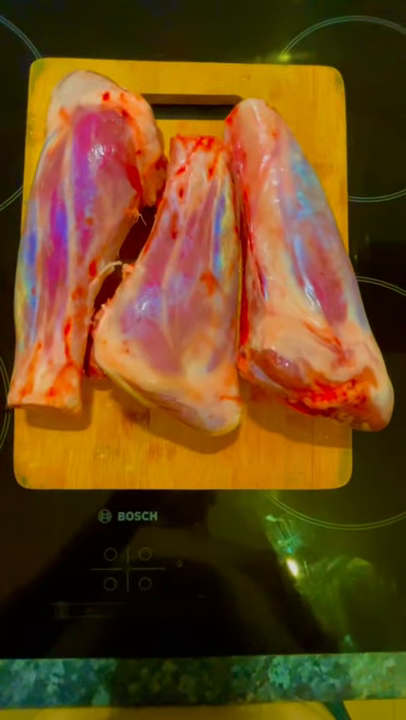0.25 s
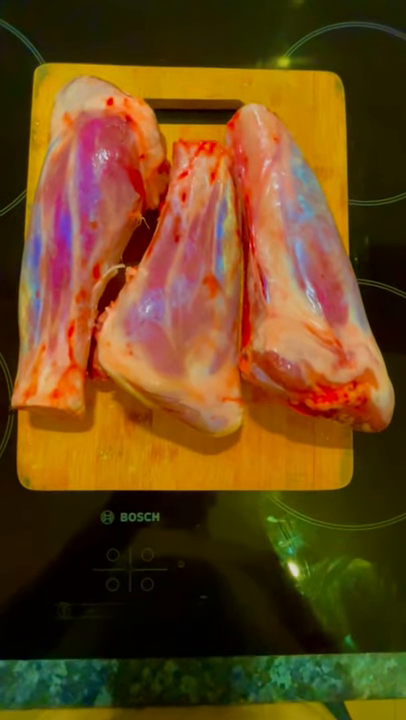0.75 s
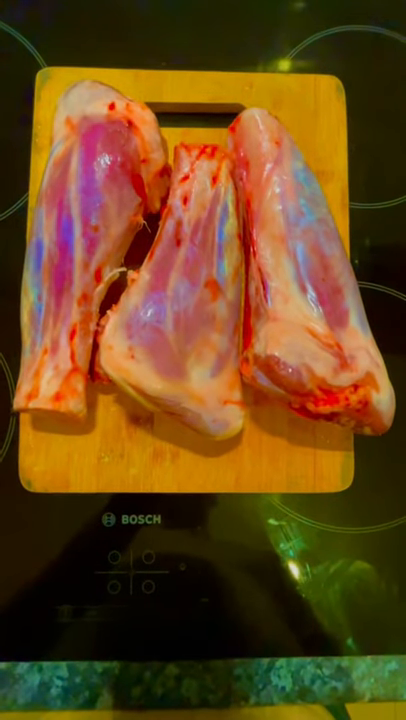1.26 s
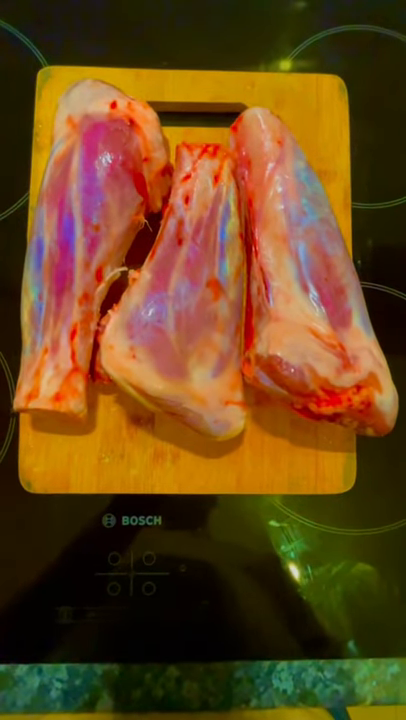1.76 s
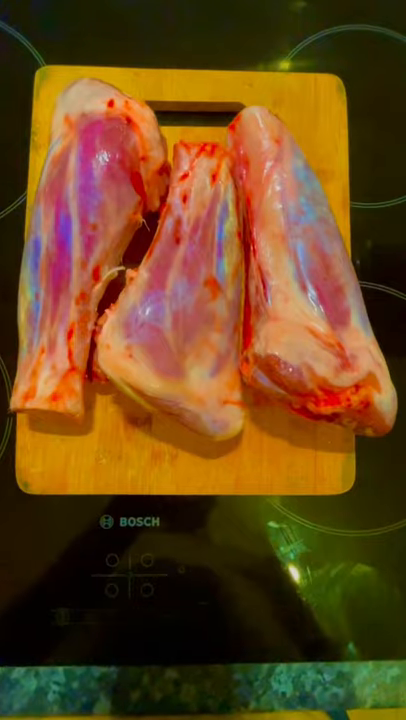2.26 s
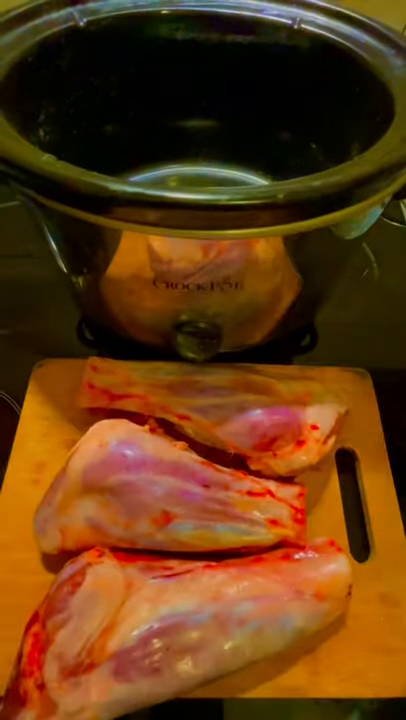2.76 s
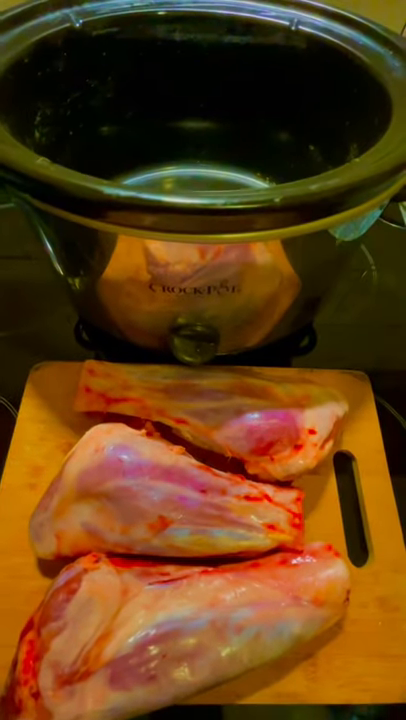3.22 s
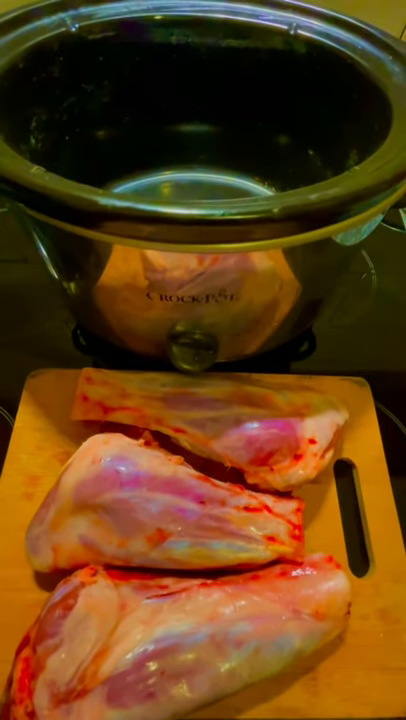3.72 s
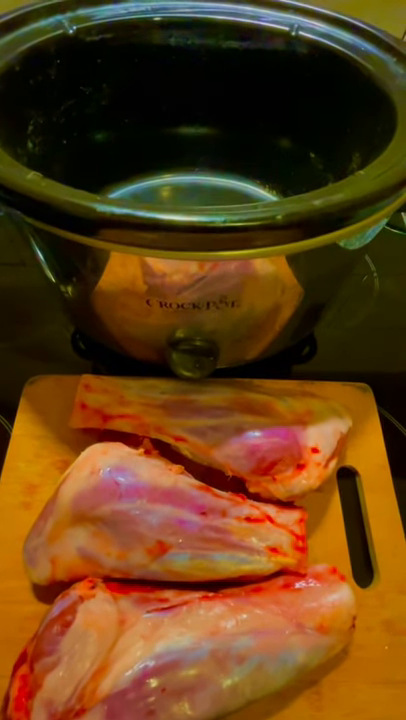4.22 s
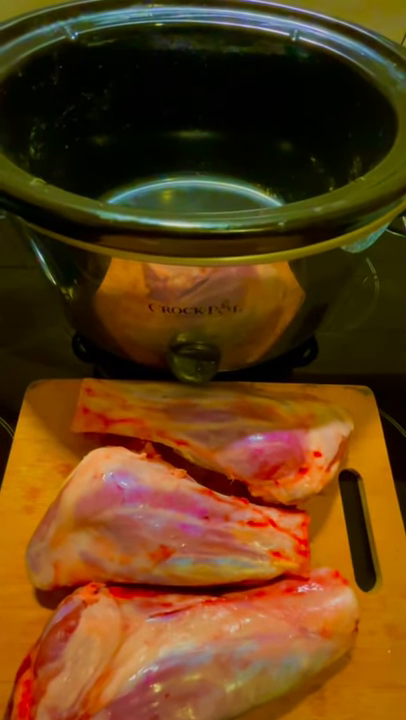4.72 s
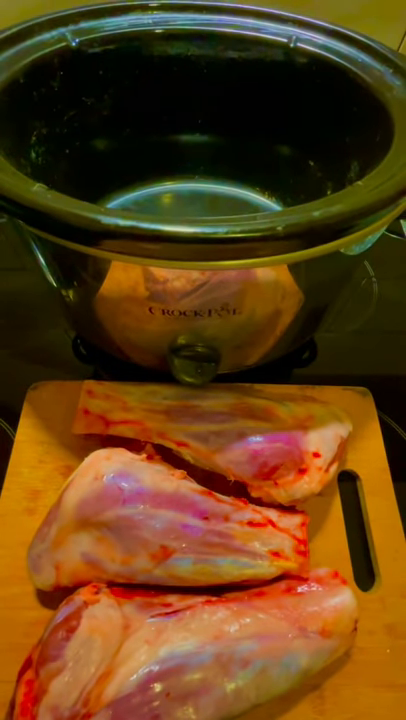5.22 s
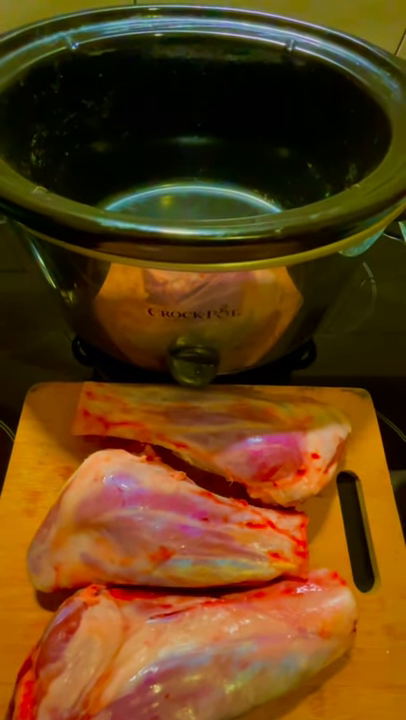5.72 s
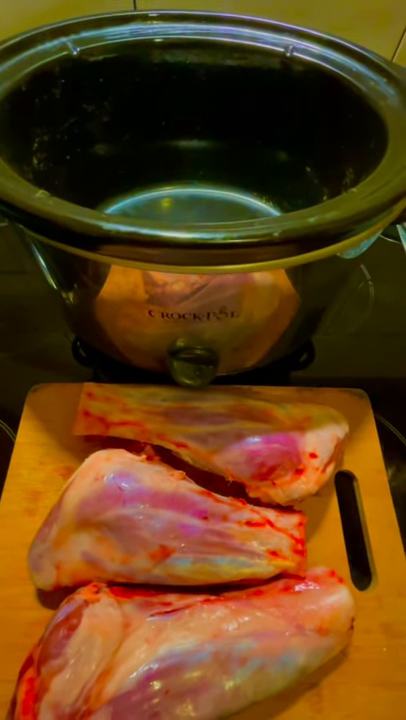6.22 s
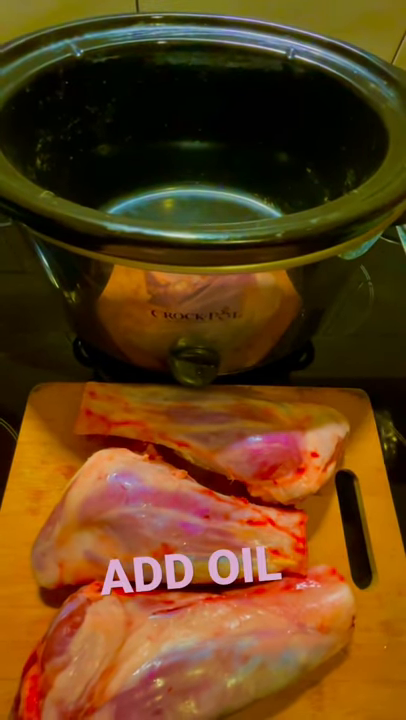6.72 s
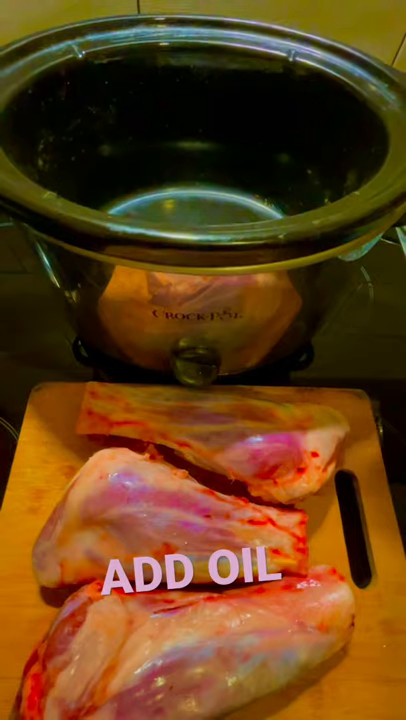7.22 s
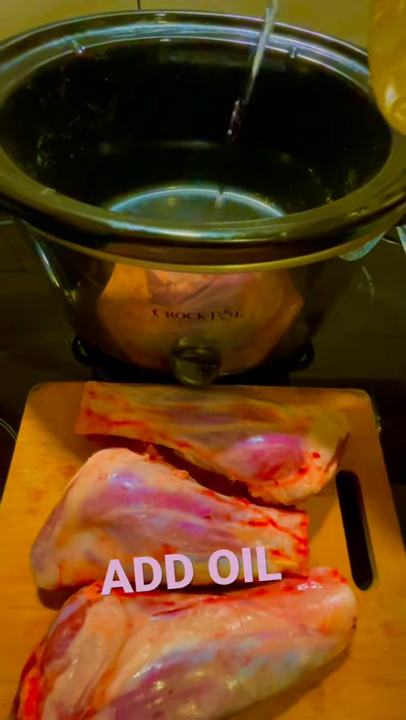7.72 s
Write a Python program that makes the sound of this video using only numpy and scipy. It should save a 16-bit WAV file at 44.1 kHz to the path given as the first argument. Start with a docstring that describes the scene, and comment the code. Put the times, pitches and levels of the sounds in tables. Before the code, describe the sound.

Close stereo pickup in a small, slightly reverberant kitchen. Steady low mains and motor hum continues throughout, joined at first by a throb that stops abruptly. A heavy pot gives a dull knock as its glass lid comes off; the lid then hits the worktop sharply, bouncing in a fast clatter. Faint plastic scrapes and cap clicks follow, strongest past five seconds, then near quiet and a faint wash of oil.

```python
"""A mains hum, a motor tone and a slow throb are heard first in a quiet kitchen; the throb stops at a cut.
A glass lid is lifted off a stoneware pot and set down on the worktop with bounces: noisy contacts excite
damped modes. Hands then shuffle a plastic bottle, heard as grains of friction noise; its cap ticks and
snaps as short noise bursts, some with hollow rings, and oil begins to run as a soft wash of noise.
Noise tails add the reflections of the room; shaped noise gives its air and uneven low noise at the sides."""
import sys
import numpy as np
from scipy import signal
from scipy.fft import rfft, irfft
from scipy.io import wavfile
from scipy.ndimage import map_coordinates

SR = 44100
rng = np.random.default_rng(int(sys.argv[2]) if len(sys.argv) > 2 else 0)


def inscribe(sig):
    """Save sig as 16-bit PCM at rate SR to the path in sys.argv[1].

    A 1-D sig is mono; a 2-D sig holds one channel per row.
    Samples are clipped to [-1, 1] before scaling.
    """
    pcm = np.round(np.clip(np.atleast_2d(sig).T, -1, 1) * 32767)
    wavfile.write(sys.argv[1], SR, pcm.astype(np.int16))


def makeup_ratio(level_db):
    """Linear amplitude ratio for a level in decibels (20 dB per factor of ten)."""
    decades = np.asarray(level_db, float) / 20
    return 10 ** decades


N = 351343
CUT_S = 2.385   # cut in the sound: throb and low side noise end, the room air changes


def blows(contacts, base):
    """Impact excitation: each contact is a short chatter that rings lid and base, with a dry crack."""
    # modes of the glass lid: (frequency [Hz], level [dB], t60 [s])
    lid_modes = [(1202, -10.5, 0.054), (1277, -8.5, 0.091), (1402, -6, .08), (1920, -6.5, 0.16),
                 (2480, -6, 0.13), (2474, -9, 0.075), (2590, -15.5, 0.17), (2825, -3.5, 0.061),
                 (2930, -6.5, .07), (3130, -12.5, 0.09), (3640, -10, 0.2), (4160, -11, 0.077),
                 (4600, -11.5, .06), (4943, -7, 0.091), (5214, -14, 0.036), (5620, -14, 0.092),
                 (6300, -19, 0.32), (6600, -27, .06), (7677, -30, .04), (8300, -24, 0.023)]
    # spectrum of the dry crack: (frequency [Hz], level [dB])
    crack_colour = [(180, -38), (300, -10.5), (665, -9), (908, -11.5), (1260, -10), (2050, -13),
                    (2430, -9.5), (3370, -15), (5060, -16), (12500, -40), (16200, -76.5), (22000, -120)]
    # a slower contact than hard_ms favours the low modes, a faster one the high modes, per octave
    hard_ms, dulling_db_per_ms = 3.8, 1.32
    out, t = np.zeros((2, N)), np.arange(SR) / SR
    for s, lid_db, thud_db, crack_db, ms in contacts:
        t_rel = t / ms * 1000
        shape = t_rel * np.exp(1 - t_rel)
        chatter = rng.standard_normal(SR) * shape
        chatter /= np.sqrt(np.sum(chatter ** 2))
        # the weight lands once, the rim rattles
        push = shape ** 8 / np.sum(shape ** 8) + 0.73 * chatter
        crack_tail = 0.23 * (1 - np.exp(-t_rel)) * makeup_ratio(-60 * t / .08)
        crack = colour(rng.standard_normal(SR), crack_colour) * (shape + crack_tail)
        bright_db = dulling_db_per_ms * (hard_ms - ms)
        lid_ring = makeup_ratio(lid_db) * strike(chatter, lid_modes, bright_db)
        thud = makeup_ratio(thud_db) * strike(push, base, 1.5 * bright_db)
        add(out, s, lid_ring + thud + makeup_ratio(crack_db) * crack, 0)
    return out


def strike(force, modes, bright_db):
    """Modal superposition: a force drives damped modes of set heights, tilted by bright_db per octave."""
    t = np.arange(len(force)) / SR
    out = 0
    for hz, db, t60 in modes:
        # the force's own spectrum at the mode is divided out
        taken_up = abs(np.sum(force[:2000] * np.exp(2j * np.pi * hz * t[:2000]))) + .3
        out = out + makeup_ratio(db + bright_db * np.log2(hz / 1000)) / taken_up * ring(force, hz, t60)
    return out


def ring(drive, hz, t60):
    """Damped resonator: a unit click sets a sine of height 1 ringing."""
    r, w = makeup_ratio(-60 / (t60 * SR)), 2 * np.pi * hz / SR
    return signal.lfilter([0, np.sin(w)], [1, -2 * r * np.cos(w), r * r], drive + 1e-18)


def bottle():
    """Transient radiation and free decay: broadband snaps, half rough hollow rings and low bumps."""
    # ticks of bottle and cap: (time [s], level [dB], centre [Hz], t60 [s], left over right [dB])
    ticks = [(4.0682, -42, 10230, 0.026, -2), (4.2614, -40, 4900, 0.041, -2),
             (4.5191, -44, 5680, 0.025, -7.5), (4.591, -42, 5470, 0.13, -1),
             (4.9574, -47.5, 4250, 0.025, -2.5), (5.0594, -40.5, 11040, 0.083, 1),
             (5.1818, -26, 5170, 0.083, -2.5), (5.2298, -33, 8360, 0.025, 0.5),
             (5.2506, -30.5, 6720, 0.049, 2), (5.2662, -37.5, 4100, 0.028, -2),
             (5.2922, -35.5, 5900, 0.03, -3.5), (5.3519, -30, 12000, 0.041, -2.5),
             (5.385, -19.5, 4815, 0.033, -1.5), (5.4347, -33, 11760, 0.031, 0),
             (5.476, -36.5, 6100, 0.044, -1.0), (5.5132, -38, 6200, 0.089, -1),
             (5.5952, -45, 4020, 0.029, -3), (6.219, -40, 4630, 0.04, 5.5),
             (7.1367, -47, 9030, 0.027, -0.5)]
    # hollow rings: (time [s], frequency [Hz], level [dB], t60 [s], bandwidth of the rough part [Hz])
    hollow_rings = [(4.171, 2010, -55, 0.035, 300), (4.447, 2353, -52.5, 0.076, 350),
                    (4.756, 1856, -51, 0.54, 50), (5.183, 704, -38.5, 0.16, 28), (5.19, 784, -48, 0.43, 37),
                    (5.19, 863, -47.5, 0.33, 53), (5.385, 1236, -43.5, 0.31, 16),
                    (5.386, 1266, -45.5, 0.51, 16), (5.382, 1303, -27.5, 0.058, 79),
                    (7.334, 950, -66.5, 1, 180), (7.335, 1204, -67, 0.404, 174),
                    (7.645, 3580, -57.5, 0.24, 12.3)]
    # soft bumps through the worktop: (time [s], level [dB], frequency [Hz], t60 [s])
    bumps = [(1.345, -40, 71, 0.13), (4.498, -55, 111, 0.3), (4.571, -41, 80, 0.12),
             (4.754, -44, 356, 0.077), (4.765, -43.5, 215, 0.13), (4.767, -37, 114, 0.19),
             (5.074, -30, 106.4, 0.11), (5.082, -40, 66.6, 0.25), (5.103, -40, 127, 0.11)]
    out, t = np.zeros((2, N)), np.arange(SR // 2) / SR
    for s, level_db, hz, t60, pan_db in ticks:
        spectrum = [(hz / 8, -22), (hz / 1.09, -3), (hz, 0), (hz * 1.75, -6), (hz * 8, -30)]
        snap = colour(rng.standard_normal(len(t)), spectrum)
        decay = makeup_ratio(level_db - 11.0 - 60 * t / t60)
        sharp_start = 1 + 2.06 * makeup_ratio(-60 * t / 0.012)
        add(out, s, decay * snap * sharp_start * np.minimum(t / 0.00081, 1), pan_db)
    for s, hz, db, t60, width_hz in hollow_rings:
        rough = ring(rng.standard_normal(2 * len(t)), hz, np.log(1000) / np.pi / width_hz)
        rough = rms_one(rough[len(t):])   # the resonator has settled by here
        tone = 0.46 * np.sin(2 * np.pi * hz * t) + .5 * rough
        add(out, s, makeup_ratio(db - 60 * t / t60) * tone * np.minimum(t / 0.00079, 1), 0)
    for s, db, hz, t60 in bumps:
        onset = 1 - np.exp(-t * hz / 0.54)
        add(out, s, makeup_ratio(db - 60 * t / t60) * np.sin(2 * np.pi * hz * t) * onset, 0)
    return out


def shuffle():
    """Friction as dense random grains: strokes, running oil and a dry brush, partly alike left and right."""
    # strokes of hands, cloth and plastic: (start [s], hold [s], bright level [dB], dull level [dB])
    strokes = [(2.96, 0.093, -81.5, -71), (3.427, 0.039, -83.5, -62), (3.86, 0.049, -76.5, -61.5),
               (3.998, 0.031, -61, -74), (4.075, 0.055, -56, -66.5), (4.17, 0.036, -64, -62),
               (4.24, 0.1, -53, -63.5), (4.43, 0.046, -65.5, -62.5), (4.506, 0.063, -58, -61.5),
               (4.672, 0.12, -57, -62.5), (4.749, 0.09, -55, -50.5), (4.92, 0.052, -64, -67.5),
               (5.09, .08, -65, -66.5), (5.184, 0.11, -55.5, -67), (5.383, 0.04, -60, -61.5),
               (5.516, 0.076, -60, -61), (5.68, 0.06, -66, -66), (5.9, .2, -80, -68.5),
               (6.227, 0.025, -74, -89.5), (6.355, 0.038, -73.5, -75), (7.143, .02, -83, -81.5)]
    # light touch between strokes, one row: (start [s], hold [s], bright level [dB], dull level [dB])
    touch = (4, 2.5, -77.5, -71.5)
    # bright rustle spectrum: (frequency [Hz], level [dB])
    rustle_colour = [(710, -41.5), (1200, -14), (1870, -8.5), (2900, -13.5), (4010, -3), (4460, -4),
                     (4830, 0.5), (7290, -2.5), (10600, -2), (12500, -6), (16200, -37), (22000, -120)]
    # dull slide spectrum: (frequency [Hz], level [dB])
    slide_colour = [(110, -30.5), (180, -0.5), (254, -4), (484, 1), (552, -7), (875, -10.5), (1410, -19),
                    (2010, -12), (3680, -25), (4200, -17), (5460, -45), (9240, -120)]
    # wash of the running oil: (frequency [Hz], level [dB])
    pour_colour = [(150, -34), (250, -7.5), (387, 1.5), (441, -11), (478, -10), (1640, -23), (2020, -13),
                   (2750, -24), (3500, -26), (3800, -25.5), (4540, -22), (6380, -33.5), (12000, -36),
                   (15600, -62), (22000, -120)]
    # sudden dry brush: (frequency [Hz], level [dB])
    brush_colour = [(150, -48), (250, -26), (340, -1.5), (716, -5.5), (1060, -11), (1280, -26), (1990, -9),
                    (2190, -19), (4610, -16.5), (12000, -38), (15600, -69), (22000, -120)]
    rise_db_per_s, fall_db_per_s = (500, 413), (300, 120)   # bright, dull
    rough_db, alike = 1.5, .7   # spread of the grain heights; share of power common to both channels
    gains = []
    for k in range(2):
        power = sum(swell(s, hold_s, db[k], rise_db_per_s[k], fall_db_per_s[k]) ** 2
                    for s, hold_s, *db in strokes + [touch])
        gains.append(np.sqrt(power))
    gains.append(swell(7.595, 0.27, level_db=-61.5, rise_db_per_s=77.5, fall_db_per_s=66))     # oil
    gains.append(swell(1.320, 0.033, level_db=-54.5, rise_db_per_s=3000, fall_db_per_s=252))   # brush
    out = 0
    for gain, spectrum in zip(gains, [rustle_colour, slide_colour, pour_colour, brush_colour]):
        grains = rng.standard_normal((2, N)) * makeup_ratio(rough_db * rng.exponential(1, N))
        mid, side = colour(grains, spectrum)
        flutter = makeup_ratio(1.1 * drift(40) + 1.2 * drift(29))
        stereo = np.sqrt(alike) * mid + np.sqrt(1 - alike) * side * [[1], [-1]]
        out = out + gain * flutter * stereo
    return out


def swell(s, hold_s, level_db, rise_db_per_s, fall_db_per_s):
    """Exponential envelope: the gain rises to a level, holds and falls, linearly in decibels."""
    t = np.arange(N) / SR
    below_db = rise_db_per_s * np.maximum(s - t, 0) + fall_db_per_s * np.maximum(t - s - hold_s, 0)
    return makeup_ratio(level_db - below_db)


def ports(x, lead, lean=((100, 0), (1000, 0))):
    """Interchannel differences: two ports hear a near source with unlike phase and level."""
    hz = bins_hz(x)
    half_phase = 1j * np.interp(hz, *np.transpose(lead)) / 2
    half_level = at_hz(lean, hz) * np.log(10) / 40   # half the dB difference, as a natural logarithm
    return filtered(x, np.exp((half_phase + half_level) * [[1], [-1]]))


def kitchen(x):
    """Diffuse reverberation: reflections as noise that dies band by band, wider in the treble."""
    # reverberation: (frequency [Hz], t60 [s], side over middle [ratio])
    reflections = [(100, 0.55, .12), (400, 0.3, .45), (900, 0.42, .8), (2010.6, .39, 0.79),
                   (6013, .37, 1.0), (8500, 0.36, 1.0), (12000, 0.12, 0.99)]
    t, edges, tail = np.arange(SR) / SR, 60 * 2 ** np.arange(0, 8.5, .5), 0
    for low, high in zip(edges, edges[1:]):
        band = signal.butter(2, [low, high], "band", fs=SR, output="sos")
        mid, side = signal.sosfilt(band, rng.standard_normal((2, SR)))
        hz = np.sqrt(low * high)
        stereo = mid + at_hz(reflections, hz, order=2) * side * [[1], [-1]]
        tail = tail + stereo * makeup_ratio(-60 * t / at_hz(reflections, hz))
    tail = tail * (1 - np.exp(-t / 0.001))   # reflections build up over the first milliseconds
    return signal.fftconvolve(x, tail / np.sqrt(np.sum(tail ** 2) / 2), axes=1)[:, :N]


def hum():
    """Periodic machines as harmonic sums: mains, motor, faint whine, and a throb that ends at the cut."""
    # motor tone before and after the cut, two lists: (time [s], frequency [Hz], level [dB])
    motor = [
        [(0, 131.6, -57), (1.3, 127.1, -57), (1.5, 127.2, -56), (2.38, 126.3, -54)],
        [(2.39, 121.3, -51.5), (3.7, 122.7, -49), (4.67, 124.1, -50), (5.2, 121.8, -50), (5.97, 123.4, -50.5),
         (7.41, 123.6, -50), (7.97, 123.9, -50)],
    ]
    # motor overtones: (multiple of the tone [ratio], level against the tone [dB])
    overtones = [(1.5, -24.5), (2.0, -31.5), (3.0, -29.5)]
    # throb of the slow machine: (multiple of its turn rate [ratio], level [dB])
    throb = [(2, -53), (3, -49), (4, -57.5), (5, -68.5), (6, -57.5), (7, -53.5), (8, -56.5), (9, -79),
             (10, -63), (12, -64.5), (14, -57.5), (15, -74)]
    throb_hz, mains_hz, whine_hz = 9.39, 99.7, 13170
    mains_db, whine_db = -53, -92.5
    t = np.arange(N) / SR
    hz, level_db = in_time(motor[0] + motor[1])
    turn = 2 * np.pi * np.cumsum(hz) / SR
    out = makeup_ratio(level_db) * (np.sin(turn) + sum(makeup_ratio(db) * np.sin(k * turn) for k, db in overtones))
    out += makeup_ratio(mains_db + 0.26 * drift(4)) * np.sin(2 * np.pi * mains_hz * t)
    out += makeup_ratio(whine_db + 2.0 * drift(20)) * np.sin(2 * np.pi * whine_hz * t)
    for k, db in throb:
        partial = np.sin(2 * np.pi * (k * throb_hz * t + rng.random()))
        out += (t < CUT_S) * makeup_ratio(db + 0.5 * drift(4.14)) * partial
    return np.sqrt(2) * out   # a sine's peak is root two times its rms


def side_noise():
    """Random amplitude modulation: low antiphase noise swells and fades at random until the cut."""
    # low spectrum of the side noise: (frequency [Hz], level [dB])
    side_colour = [(20, -21.5), (60, 1.5), (90, -0.5), (150, -2.5), (250, -30), (500, -52)]
    lumps = (np.arange(N) < CUT_S * SR) * makeup_ratio(-59.5 + 5.0 * drift(14))   # level and swing in dB
    return lumps * colour(rng.standard_normal(N), side_colour) * [[1], [-1]]


def air():
    """Stationary noise of the room as middle and side spectra, which change at the cut."""
    # middle spectrum before and after the cut, two lists: (frequency [Hz], level [dB])
    mid_colours = [
        [(15, -31), (30, -21.5), (55, -8), (85, -1.5), (125, -13.5), (145, -13.5), (165, -15.5), (200, -28),
         (300, -28.5), (410, -31), (465, -19), (530, -38), (900, -41.5), (3250, -48.5), (12800, -64.5),
         (20000, -80)],
        [(15, -14), (35, -15.5), (48, -0.5), (88, -2), (140, -8), (160, -22), (250, -20), (320, -27),
         (380, -25), (430, -27), (475, -25), (560, -38.5), (2000, -45.5), (7000, -54), (12800, -56),
         (20000, -57.5)],
    ]
    # side spectrum before and after the cut, two lists: (frequency [Hz], level [dB])
    side_colours = [
        [(12, -72), (20, -17.5), (65, -14.5), (127, -15.5), (277, -29), (446, -22.5), (678, -31.5),
         (10800, -62), (13200, -58.5), (16000, -86)],
        [(12, -54), (20, -23), (81, -4.5), (262, -18), (399, -11.5), (976, -24), (5850, -38), (10800, -45),
         (12800, -36), (16000, -58)],
    ]
    mid_db, side_db = [-57, -56.5], [-64.5, -70.5]   # before, after
    after = np.arange(N) >= CUT_S * SR
    out = np.zeros((2, N))
    for k, heard in enumerate([~after, after]):
        mid = makeup_ratio(mid_db[k]) * colour(rng.standard_normal(N), mid_colours[k])
        side = makeup_ratio(side_db[k]) * colour(rng.standard_normal(N), side_colours[k])
        out += heard * (mid + side * [[1], [-1]])
    return out


def rms_one(x):
    """Power normalisation: scale to rms 1."""
    return x / np.sqrt(np.mean(x ** 2) + 1e-20)


def in_time(rows):
    """Linear interpolation: columns of a curve at every sample."""
    s, *columns = np.transpose(rows)
    return [np.interp(np.arange(N) / SR, s, c) for c in columns]


def at_hz(points, hz, order=1):
    """Logarithmic pitch scale: read a column of a (frequency, value, ..) table on a log axis."""
    return np.interp(np.log(hz + 1), np.log(np.array(points)[:, 0]), np.array(points)[:, order])


def bins_hz(x):
    """Discrete spectrum: frequencies of the transform of x."""
    return np.fft.rfftfreq(x.shape[-1], 1 / SR)


def filtered(x, gain):
    """Linear filtering: apply a gain at every frequency."""
    return irfft(rfft(x) * gain, x.shape[-1])


def colour(x, spectrum):
    """Spectral shaping: filter noise to a spectrum; rms 1."""
    return rms_one(filtered(x, makeup_ratio(at_hz(spectrum, bins_hz(x)))))


def drift(rate):
    """Slow random fluctuation: a smooth curve through rate normal draws per second."""
    knots = rng.standard_normal(int(N / SR * rate) + 3)
    return map_coordinates(knots, [np.arange(N) / SR * rate], order=3)


def add(out, s, sound, pan_db):
    """Superposition: lay a sound into both channels at a time, with a left over right level."""
    at = round(s * SR)
    out[:, at:at + len(sound)] += sound[:N - at] * makeup_ratio([[pan_db / 2], [-pan_db / 2]])


def scene():
    """Direct and reverberant sound: close knocks and ticks with their room, over the steady layers."""
    # contacts of the lid on the pot:
    # (time [s], lid ring [dB], thud [dB], crack [dB], time to the peak of the contact [ms])
    lift = [(2.434, -60, -51, -45.5, 4.0), (2.441, -39.5, -39, -33.5, 1.5), (2.447, -36, -19, -35.5, 4.0),
            (2.498, -28, -29.5, -24.5, 3.0), (2.505, -29.5, -14, -22, 4.0), (2.518, -28.5, -18, -25.5, 4.0),
            (2.531, -41.5, -21.5, -29, 5.0), (2.547, -40, -29, -35, 1.1)]
    # contacts of the lid on the worktop, same columns:
    # (time [s], lid ring [dB], thud [dB], crack [dB], time to the peak of the contact [ms])
    set_down = [(3.436, -50, -34, -41, 4.0), (3.4435, -17, -7, -19.5, 1.6), (3.4775, -14, -11, -10, 2.6),
                (3.4835, -22, -10, -14.5, 2.5), (3.492, -23.5, -16.5, -20.5, 2.7),
                (3.502, -25, -19.5, -20.5, 3.6), (3.5075, -15.5, -15, -13, 2.1)]
    # modes of the stoneware pot: (frequency [Hz], level [dB], t60 [s])
    pot = [(121.3, -13.5, 0.095), (178, -7, 0.15), (212.46, 1, 0.12), (255.7, -8, 0.11), (518, -9.5, 0.059),
           (1050, -11.5, 0.052), (1720, -20.5, 0.053), (957, -34, 0.66), (1675, -14, 0.16),
           (1680, -22.5, .65), (2592, -21, 0.36), (3640, -24.5, .22), (4050, -20, .1)]
    # modes of the worktop: (frequency [Hz], level [dB], t60 [s])
    worktop = [(112, -11.5, .25), (198, -7.5, 0.1), (254, -4.5, 0.11), (370, -14, 0.089), (584, -9, 0.069),
               (635, -5, .05), (671, -4, 0.11), (722, -2, 0.067), (790, -8, 0.074), (963, -13, .08)]
    # phase between the ports, a list for the lid and one for the hands:
    # (frequency [Hz], lead of the left [rad])
    lead = [
        [(0, -0.5), (2760, 1), (3010, -0.18), (3700, 1.5), (4220, 0.56), (4820, -7.5), (5510, -6), (8440, -1.5),
         (9300, -3), (10100, 1.5), (12000, 1.35), (13000, 3.0), (15800, 3.5), (16200, 3)],
        [(0, 0), (1890, -1.23), (2580, -0.6), (3880, 2), (4910, -5.5), (5510, -6.5), (8530, -0.83),
         (9220, -1.63), (10400, 1.46), (12100, 0.2), (13200, 3.5), (15100, 1.5), (15700, 4.5), (16200, 5)],
    ]
    # level between the ports for the lid: (frequency [Hz], left over right [dB])
    lean = [(100, -.5), (250, -2), (600, -3.3), (1200, -2), (2400, -3.3), (4400, .5), (8000, -1.5)]
    knock_low_cut = signal.butter(2, 95., "high", fs=SR, output="sos")   # the knocks carry no deep bass below about 95 Hz
    lid = signal.sosfilt(knock_low_cut, blows(lift, pot) + blows(set_down, worktop))
    small = bottle()
    near = ports(lid, lead[0], lean) + ports(small + shuffle(), lead[1])
    reflected = kitchen(makeup_ratio(-9.5) * lid + makeup_ratio(-10.5) * small)
    return near + reflected + hum() + air() + side_noise()


def roll_off(x):
    """The treble ends steeply here."""
    return signal.sosfilt(signal.butter(12, 16650, fs=SR, output="sos"), x)


def record(dry):
    """Filtering and soft saturation: deep bass is lost, a narrow high band nearly empty, peaks rounded."""
    # overall tone of the sound: (frequency [Hz], gain [dB])
    tone = [(20, -22.5), (55, -0.5), (90, -0.5), (12500, -0.5), (13150, -6.5), (13400, -33.5),
            (14800, -30.5), (15200, 4), (15900, 4), (16300, -50)]
    heard = filtered(dry, makeup_ratio(at_hz(tone, bins_hz(dry))))
    mix = 1.071 * np.tanh(heard / 1.123)
    return roll_off(mix)


dry = scene()
out = record(dry)
inscribe(out)
```